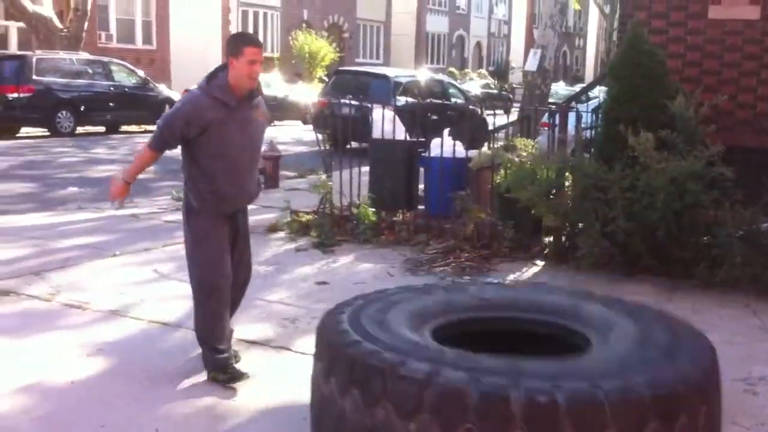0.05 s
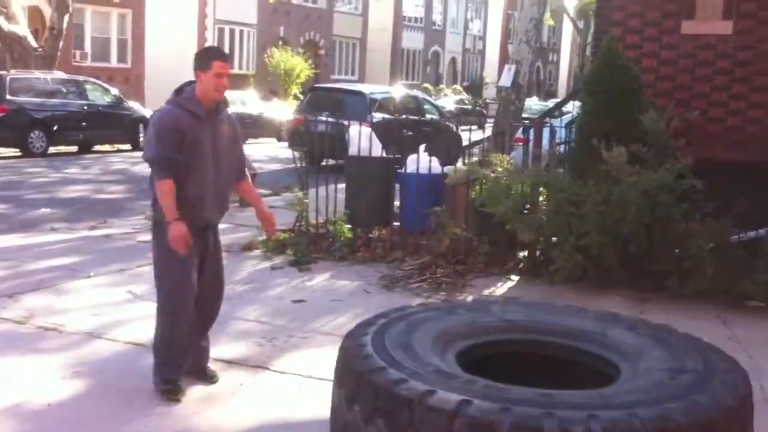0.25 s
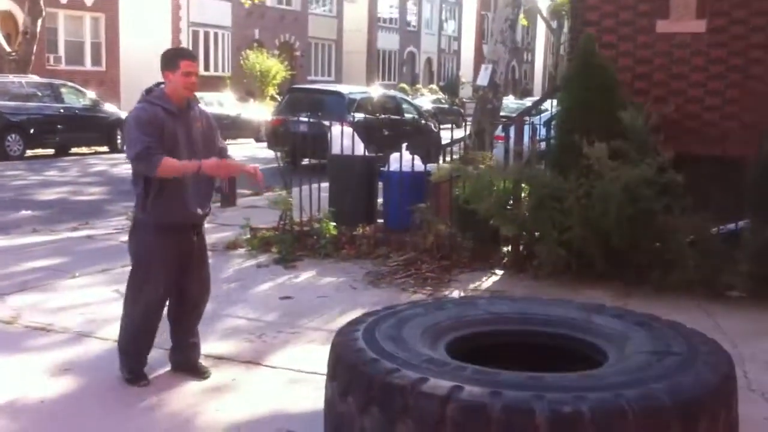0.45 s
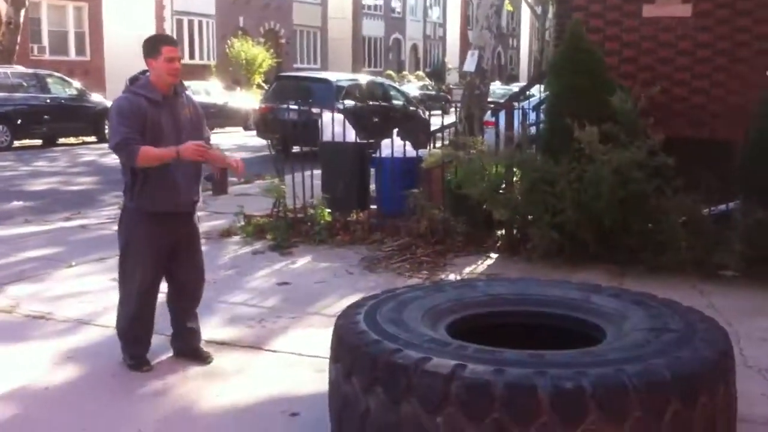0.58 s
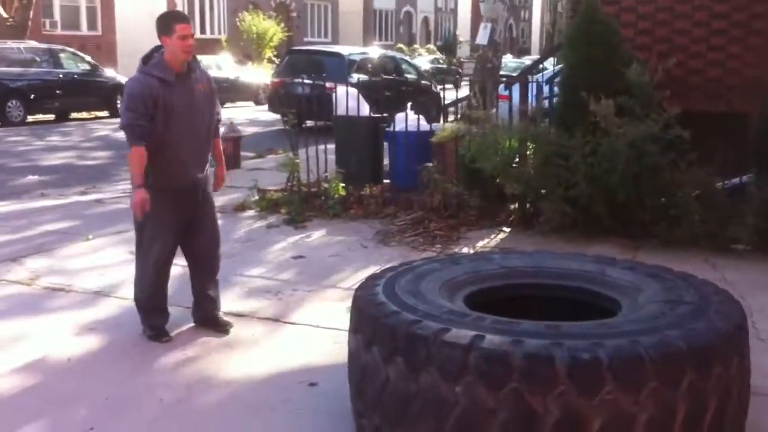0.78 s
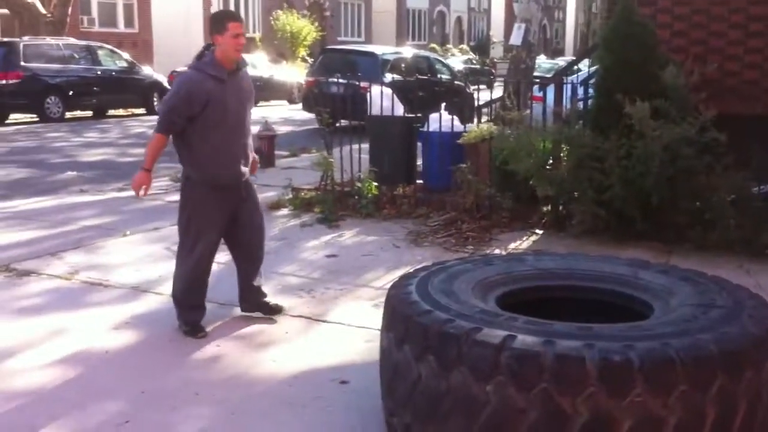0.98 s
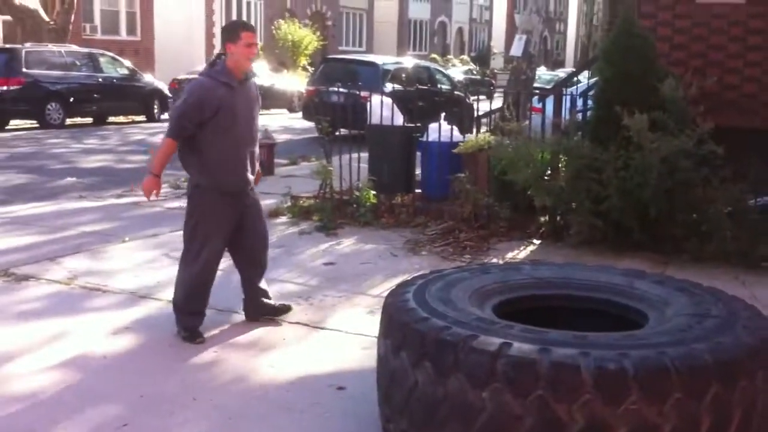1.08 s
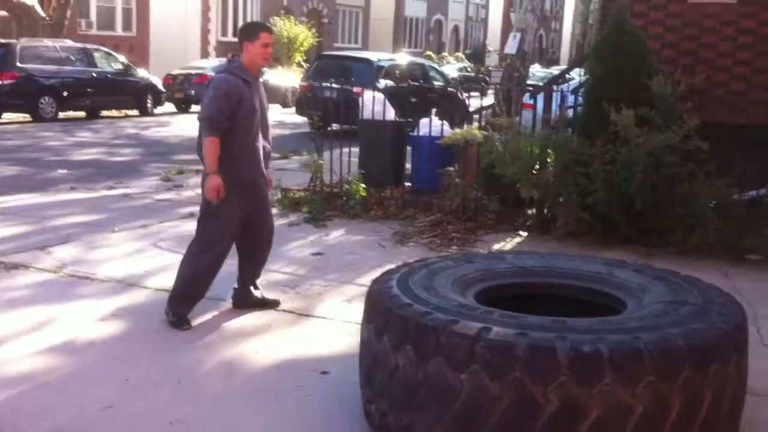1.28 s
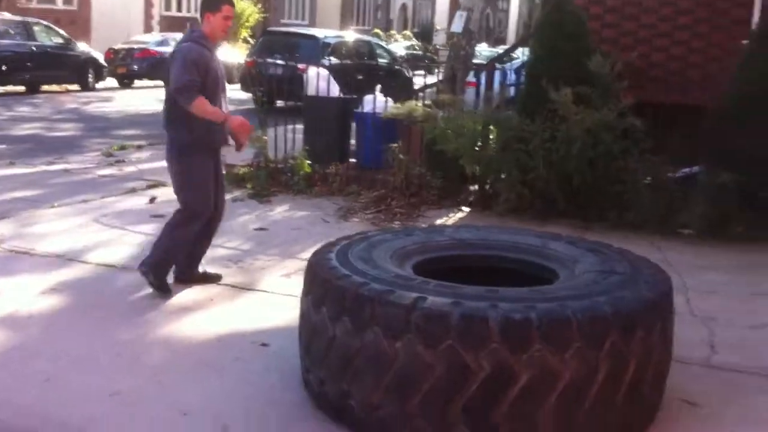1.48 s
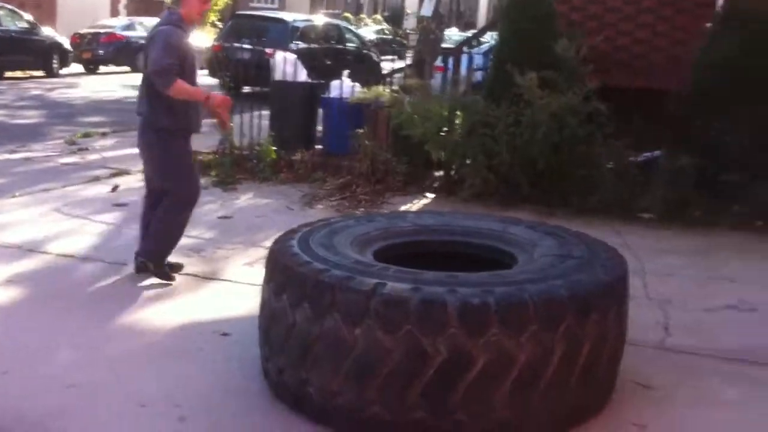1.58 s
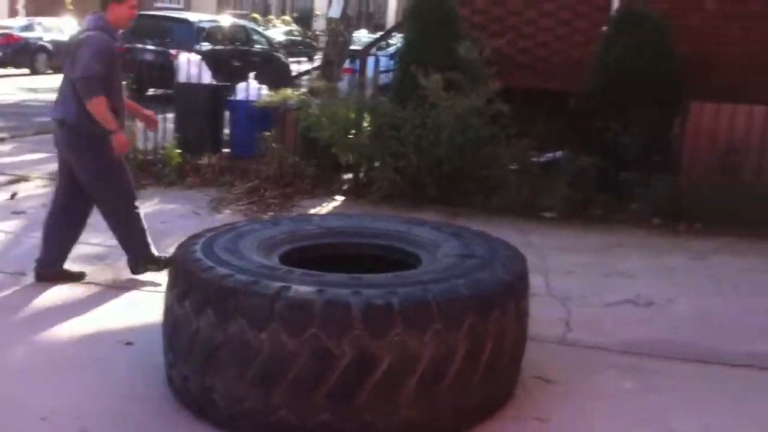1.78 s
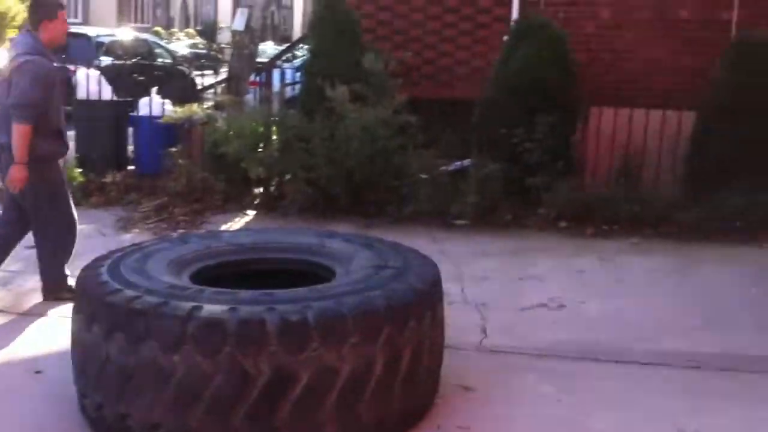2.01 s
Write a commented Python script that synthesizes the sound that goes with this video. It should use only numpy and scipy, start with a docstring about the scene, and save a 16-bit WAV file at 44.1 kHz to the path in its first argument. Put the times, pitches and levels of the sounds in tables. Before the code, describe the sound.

Heavy rubber tyre lands hard on a driveway, rings hollow and hums on, bumps once more, then quiet gritty footsteps over faint distant traffic; a single handheld microphone overloads slightly and ducks at the slam.

```python
"""A huge tyre falls flat on a concrete driveway, over steady noise of distant traffic and leaves.
Rubber slaps down in quick thuds and cracks; the carcass rings, the hollow rattles, the houses echo, and
beating pairs of modes boom on inside the tyre. A noise thump over ground grit settles it, then a faint rumble.
Later, sprays of clicks scuff like soles on concrete and short pings snap like grit under a shoe.
A gain control ducks the whole mix at the slam and recovers slowly."""
import sys
import numpy as np
from scipy import signal
from scipy.fft import rfft, irfft
from scipy.io import wavfile
from scipy.ndimage import uniform_filter1d

SR = 44100
rng = np.random.default_rng(int(sys.argv[2]) if len(sys.argv) > 2 else 0)


def store_pcm(level_fs):
    """Save levels as 16-bit WAV."""
    pcm = np.round(np.clip(level_fs, -1, 1) * 32767).astype(np.int16)
    wavfile.write(sys.argv[1], SR, np.atleast_2d(pcm).T)


N = 90404
T = np.arange(N) / SR  # seconds
HZ = np.fft.rfftfreq(N, 1 / SR)
LANDING_S = 0.232


def amp(db):
    """Decibels to gain."""
    return 10 ** (np.asarray(db) / 20)


def unit(x):
    """Scales to rms 1."""
    return x / np.sqrt(np.mean(x ** 2) + 1e-20)


def read(points, hz):
    """Reads a table on a log-frequency axis."""
    f, value = np.transpose(points)
    return np.interp(np.log(hz + 1), np.log(f + 1), value)


def colour(x, spectrum):
    """Filters x by a spectrum table and scales it to rms 1."""
    return unit(irfft(rfft(x) * amp(read(spectrum, HZ)), N))


def noise(spectrum):
    """Coloured noise at rms 1."""
    return colour(rng.standard_normal(N), spectrum)


GRAINS_PER_S, GRAIN_SPREAD_DB = 2500, 3  # average density; scale of the uneven sizes


def grains(spectrum):
    """A dense spray of tiny clicks of uneven size and random sign, at rms 1."""
    size = amp(GRAIN_SPREAD_DB * np.minimum(rng.exponential(1, N), 4))
    sign = rng.choice([-1, 1], N)
    present = rng.random(N) < GRAINS_PER_S / SR
    return colour(size * sign * present, spectrum)


def since(start):
    """Seconds since start, zero before it."""
    return np.maximum(T - start, 0)


def strike(start, rise, decay):
    """Quick rise, exponential decay; both are time constants in seconds."""
    return (1 - np.exp(-since(start) / rise)) * np.exp(-since(start) / decay)


def decay_from(t60):
    """Time constant of a decay that loses 60 dB in t60 seconds."""
    return t60 / np.log(1000)


def swell(peak, rise, fall):
    """Grows to a rounded peak and dies away."""
    growing = np.exp(np.minimum((peak - T) / rise, 50))
    dying = np.exp(np.minimum((T - peak) / fall, 50))
    return 2 / (growing + dying)


# Colour of distant traffic and leaves. Each row: frequency in Hz, level in dB.
STREET_NOISE_COLOUR = [(25, -42), (60, -12), (100, -4.5), (180, 5), (280, 0), (500, -3.5), (900, -4.5),
                       (1300, -5), (2200, -3.5), (4500, -7.5), (6500, -12), (8800, -12), (11500, -25),
                       (13500, -30), (15500, -27)]
AMBIENCE_DB, AMBIENCE_WAVER_DB = -47, 0.25  # mean level; rms size of the waver


def ambience():
    """Distant traffic and leaves blend into steady noise whose level wavers a little."""
    waver = unit(uniform_filter1d(rng.standard_normal(N), size=3000))
    return amp(AMBIENCE_DB + AMBIENCE_WAVER_DB * waver) * noise(STREET_NOISE_COLOUR)


# Colour of grit on concrete, under shoes and rubber alike. Each row: frequency in Hz, level in dB.
GRIT_COLOUR = [(100, -25.5), (1500, -10), (4200, 4.5), (6500, -4), (8800, 5.5), (11500, -14.5),
               (15300, -11)]
# Soles dragged over concrete. Each row: peak in seconds, level in dB, rise in seconds, fall in seconds,
# pitch of the rasp in Hz.
SCUFFS = [(1.163, -41.5, 0.014, .025, 4580), (1.193, -41, 0.024, .022, 1950),
          (1.218, -47, .008, 0.016, 4100), (1.265, -47, 0.017, 0.058, 2600),
          (1.356, -41, 0.024, .014, 3600), (1.405, -49, .01, 0.023, 2200)]
# Colour of a scraping sole. Each row: frequency in Hz, level in dB.
SOLE_COLOUR = [(100, -12), (600, -25), (1200, -5), (1900, 0.5), (3300, -2.5), (4500, 2), (6300, -6),
               (9000, -3), (11500, -20), (15500, -19)]
RASP_DB, RASP_OCT = -5, 0.16  # level against the scrape; width of the rasp band in octaves


def scuffs():
    """Soles scrape the concrete in sprays of clicks, each stroke with its own narrow rasp."""
    out = np.zeros(N)
    for peak, db, rise, fall, rasp_hz in SCUFFS:
        scrape = grains(SOLE_COLOUR)
        octaves_off = np.log2((HZ + 1) / rasp_hz)
        band = np.exp(-0.5 * (octaves_off / RASP_OCT) ** 2)
        rasp = unit(irfft(rfft(scrape) * band, N))
        out += amp(db) * swell(peak, rise, fall) * unit(scrape + amp(RASP_DB) * rasp)
    return out


# Bits of grit snapping under a shoe. Each row: start in seconds, level in dB, pitch in Hz.
SNAPS = [(0.807, -33, 5500), (1.260, -28, 2480), (1.350, -28, 4500), (1.36, -28, 3780), (1.3958, -25, 4920),
         (1.4733, -25, 5370), (1.826, -45, 10900), (1.869, -43, 13100)]
SNAP_RISE_S, SNAP_DECAY_S = 0.0001, 0.00078
SNAP_NOISE_DB, SNAP_TAIL_DB, SNAP_TAIL_S = -16.5, -19, 0.016  # dB against the snap's own level


def snaps():
    """Single bits of grit snap as very short pings, each with a fainter, longer scatter of grains."""
    out, grit = np.zeros(N), grains(GRIT_COLOUR)
    for start, db, hz in SNAPS:
        ping = np.sin(2 * np.pi * hz * since(start)) + amp(SNAP_NOISE_DB) * grit
        snap = ping * strike(start, SNAP_RISE_S, SNAP_DECAY_S)
        scatter = amp(SNAP_TAIL_DB) * grit * strike(start, SNAP_RISE_S, SNAP_TAIL_S)
        out += amp(db) * (snap + scatter)
    return out


# Deep colour of the tyre rocking on its sidewall. Each row: frequency in Hz, level in dB.
WOBBLE_COLOUR = [(20, -14), (52, 8), (80, -9), (160, -32), (1000, -70)]
WOBBLE_S, WOBBLE_DB, WOBBLE_RISE_S, WOBBLE_FALL_S = 0.56, -54, 0.078, 0.045


def wobble():
    """A faint deep rumble as the tyre rocks to rest on its sidewall."""
    return amp(WOBBLE_DB) * noise(WOBBLE_COLOUR) * swell(WOBBLE_S, WOBBLE_RISE_S, WOBBLE_FALL_S)


# Colour of the thump as the tyre comes down again. Each row: frequency in Hz, level in dB.
THUMP_COLOUR = [(40, -28), (110, -4), (220, 11), (400, -9), (700, -8), (1400, -18), (2000, -2), (3500, -11),
                (6000, -29), (16000, -29)]
SETTLE_S, SETTLE_RISE_S, SETTLE_FALL_S, SETTLE_DB = 0.4465, 0.015, 0.014, -21.5
GRIND_RISE_S, GRIND_FALL_S, GRIND_DB = 0.022, 0.032, -33.5


def settle():
    """The tyre comes down again after its bounce: a soft noise thump, with grit ground under the rubber."""
    thump = amp(SETTLE_DB) * noise(THUMP_COLOUR) * swell(SETTLE_S, SETTLE_RISE_S, SETTLE_FALL_S)
    grind = amp(GRIND_DB) * grains(GRIT_COLOUR) * swell(SETTLE_S, GRIND_RISE_S, GRIND_FALL_S)
    return thump + grind


# Colour of the echo between the houses. Each row: frequency in Hz, level in dB.
STREET_ECHO_COLOUR = [(30, -29), (60, -12), (110, -14), (220, 6), (500, -3.5), (850, 1), (1350, -5.5),
                      (2100, -2), (3200, -12.5), (5500, -26), (10000, -56), (16000, -62)]
# How long the echo lasts across the spectrum. Each row: frequency in Hz, 60 dB decay time in seconds.
STREET_ECHO_T60 = [(50, 2), (250, 1.17), (800, 1.54), (2000, 1.383), (5000, 1.37), (16000, 0.35)]
STREET_DB, STREET_RISE_S = -18.5, 0.01


def street_echo():
    """The houses throw the slam back: noise whose every frequency dies at its own rate."""
    hz, frame_s, spectrogram = signal.stft(noise(STREET_ECHO_COLOUR), SR, nperseg=512)
    decay = decay_from(read(STREET_ECHO_T60, hz))[:, None]
    spectrogram = spectrogram * np.exp(-np.maximum(frame_s - LANDING_S, 0) / decay)
    tail = signal.istft(spectrogram, SR)[1][:N]
    return amp(STREET_DB) * tail * (1 - np.exp(-since(LANDING_S) / STREET_RISE_S))


# Colour of the dense rattle in the tyre's hollow. Each row: frequency in Hz, level in dB.
HOLLOW_COLOUR = [(40, -16), (130, -3), (280, 1), (600, 0.5), (900, -4), (1350, -8), (1900, 0), (3200, -7),
                 (5500, -30), (8700, -30), (11500, -53), (16000, -54)]
HOLLOW_DB, HOLLOW_T60_S, HOLLOW_RISE_S = -9.5, 0.37, 0.0044


def hollow():
    """Reflections crowd together in the tyre's hollow and fade as a burst of noise."""
    return amp(HOLLOW_DB) * noise(HOLLOW_COLOUR) * strike(LANDING_S, HOLLOW_RISE_S, decay_from(HOLLOW_T60_S))


# Air modes inside the tyre, in close pairs that beat. Each row: frequency in Hz, level in dB,
# 60 dB decay time in seconds, beat rate in Hz, time of a beat's dip in seconds.
AIR_MODES = [(139.8, -27.5, 3.4, 0.78, 0.89), (185, -29, 0.58, 0.59, 0.6), (224.7, -34.5, 4.78, 1.1, 0.534),
             (312, -35, 3.15, 0.92, 0.6), (392, -22.5, 0.8, 0.44, 1.12), (426.5, -27.5, 1.57, 0.28, 1.22),
             (617, -28, 1.32, 1.7, 1.05), (687, -35, 1.9, 0.62, 1.53), (764, -34, 2.24, 1.34, 0.77),
             (849, -40.5, 3.04, 0.47, 2), (875, -31, 1.9, .9, 0.52), (1032, -35.5, 1.94, 1.2, 1.38)]
PAIR_SHARE, CAVITY_RISE_S = 0.64, 0.056  # gain of the second mode against the first; swell-in time


def boom():
    """The ring of air inside the tyre hums on in slowly beating pairs of modes."""
    out = np.zeros(N)
    for hz, db, t60, beat_hz, dip in AIR_MODES:
        pair = 1 - PAIR_SHARE * np.exp(2j * np.pi * beat_hz * (T - dip))
        carrier = np.exp(2j * np.pi * (hz * T + rng.random()))
        out += amp(db) * strike(LANDING_S, CAVITY_RISE_S, decay_from(t60)) * (pair * carrier).real
    return out


# Rubber meeting concrete. Each row: start in seconds, thud level in dB, thud pitch in Hz,
# crack level in dB, decay time constant in seconds.
SLAPS = [(0.2279, -8, 574, -24, 0.0026), (0.2316, -4, 680, -5.5, .002), (0.2336, 10, 1556, 5.5, 0.0015),
         (0.2351, 11.5, 2130, 6.5, 0.0012), (0.2481, 13, 840, 4, 0.0013), (.2570, 3.5, 510, -5, .001),
         (.2810, 2.5, 1150, -0.5, 0.0011)]
# Colour of the crack. Each row: frequency in Hz, level in dB.
CRACK_COLOUR = [(100, 3), (300, -7.5), (1000, 1), (2200, 3), (4300, -5), (5600, -19.5), (8700, -14.5),
                (11000, -38), (15500, -30)]
# Short ring of the rubber carcass. Each row: frequency in Hz, level in dB, 60 dB decay time in seconds.
CARCASS = [(92, -24, .3), (253, -10.5, 0.21), (307.3, -0.5, 0.082), (408.4, -11.5, 0.19),
           (516.7, -15.5, 0.35), (677, -11.5, 0.19), (901, -9.5, 0.2), (1109, -10.5, 0.16),
           (1787, -6.5, 0.13), (2390, -14, 0.11), (3140, -20.5, 0.19)]
SLAP_RISE_S, SLAP_LOW_CUT_HZ = 0.0003, 160
FIZZ_HZ, FIZZ_FADE_S = 10000, 0.03  # the top of the crack and its fading time constant


def crack_noise():
    """Crisp noise whose top fades from the landing on, as the rubber beds down."""
    crack = noise(CRACK_COLOUR)
    fizz = irfft(rfft(crack) * (HZ > FIZZ_HZ), N)
    return crack - fizz * (1 - np.exp(-since(LANDING_S) / FIZZ_FADE_S))


def slam():
    """Parts of the sidewall land with thud and crack; the carcass rings. Little deep bass is radiated."""
    crack, out = crack_noise(), np.zeros(N)
    for start, thud_db, hz, crack_db, decay in SLAPS:
        thud = amp(thud_db) * np.sin(2 * np.pi * hz * since(start))
        out += strike(start, SLAP_RISE_S, decay) * (thud + amp(crack_db) * crack)
    for hz, db, t60 in CARCASS:
        tone = np.sin(2 * np.pi * (hz * since(LANDING_S) + rng.random()))
        out += amp(db) * strike(LANDING_S, SLAP_RISE_S, decay_from(t60)) * tone
    return signal.lfilter(*signal.butter(2, SLAP_LOW_CUT_HZ, "high", fs=SR), out)


def scene():
    """Mixes every layer at one microphone."""
    background = ambience() + scuffs() + snaps()
    tyre = wobble() + settle() + street_echo() + hollow() + boom() + slam()
    return (background + tyre)[None]


THRESHOLD_DB, DUCK_SHARE, RECOVER_S = -17.5, 0.59, 1.67  # dB ducked per dB over; recovery time constant
CEILING, EDGE_HZ = 0.8, 15800  # soft overload limit; top of the band


def record(dry):
    """Gain control ducks at once and recovers slowly; then soft overload and a band limit."""
    level_db = 10 * np.log10(abs(uniform_filter1d(dry[0] ** 2, size=300)) + 1e-12)
    over_db = np.maximum(level_db - THRESHOLD_DB, 0)
    # A running maximum holds each peak while it sinks exponentially
    recovery = np.exp(-T / RECOVER_S)
    held_db = np.maximum.accumulate(over_db / recovery) * recovery
    ducked = dry * amp(-DUCK_SHARE * uniform_filter1d(held_db, size=60))
    clipped = CEILING * np.tanh(ducked / CEILING)
    low_pass = signal.firwin(511, EDGE_HZ, window=("kaiser", 9), fs=SR)
    return signal.oaconvolve(clipped, low_pass[None], "same")


dry = scene()
out = record(dry)
store_pcm(out)
```